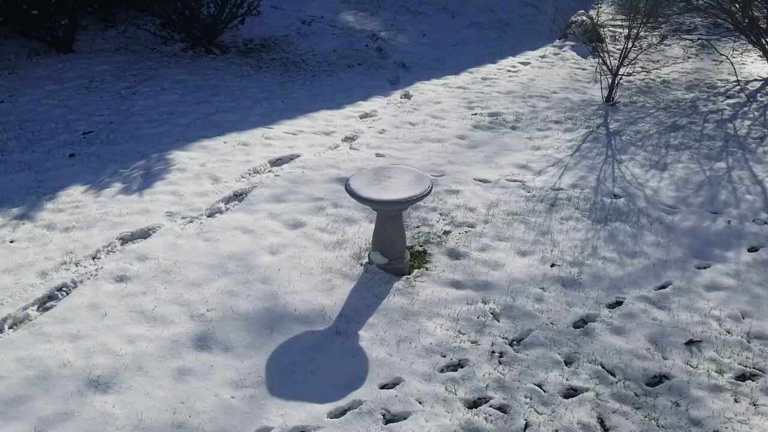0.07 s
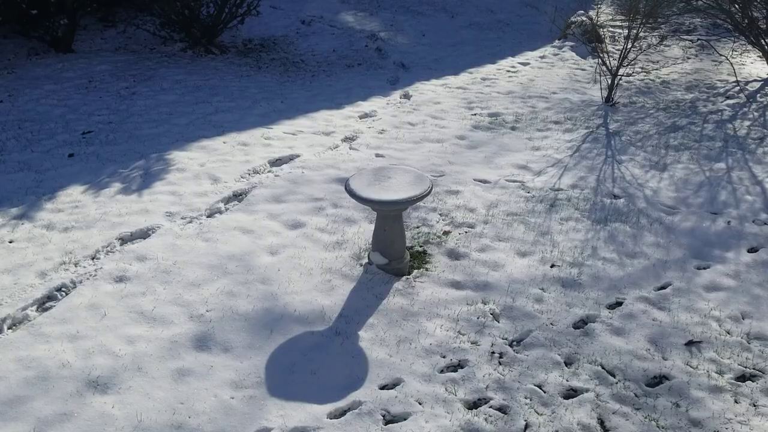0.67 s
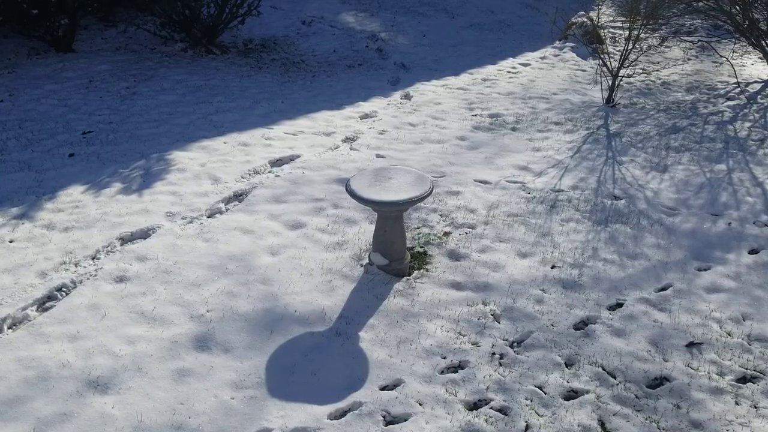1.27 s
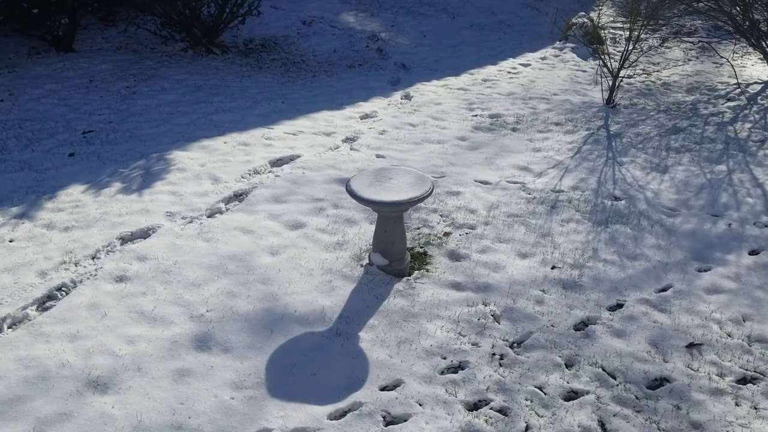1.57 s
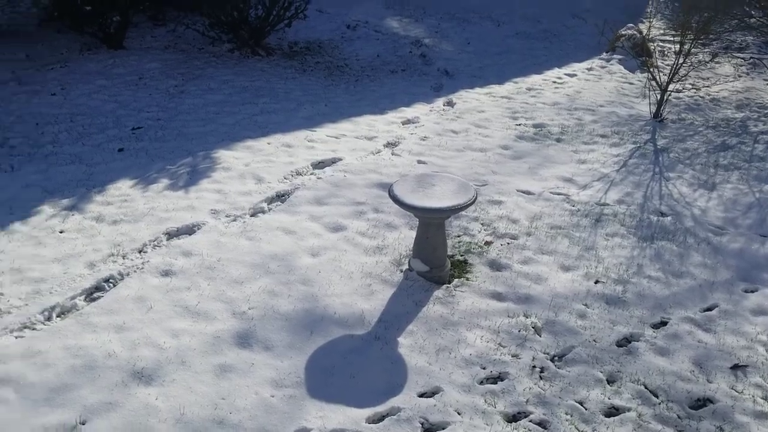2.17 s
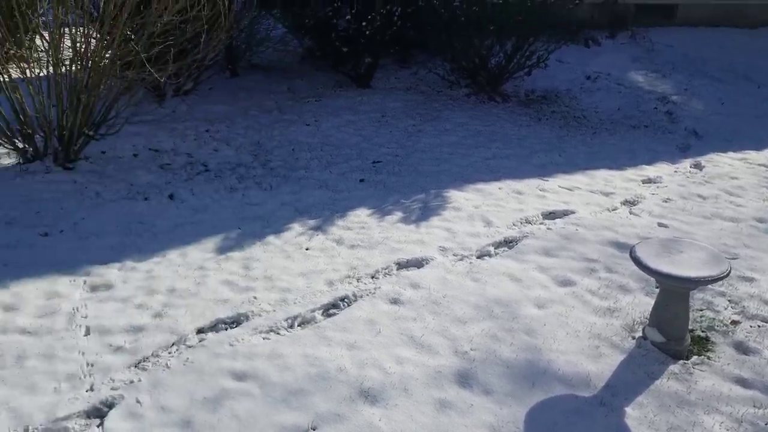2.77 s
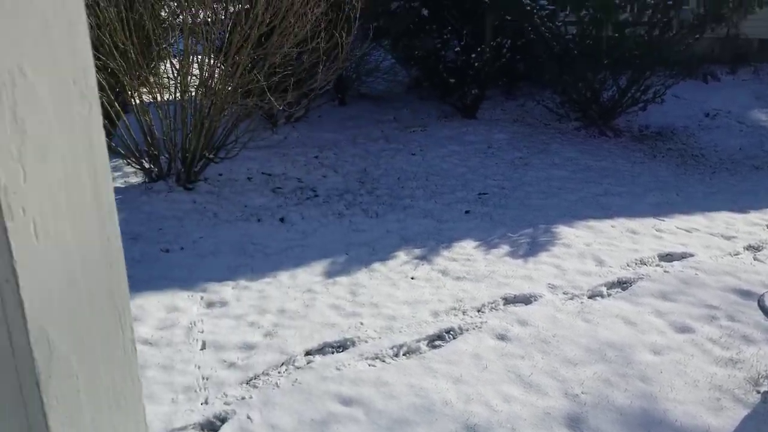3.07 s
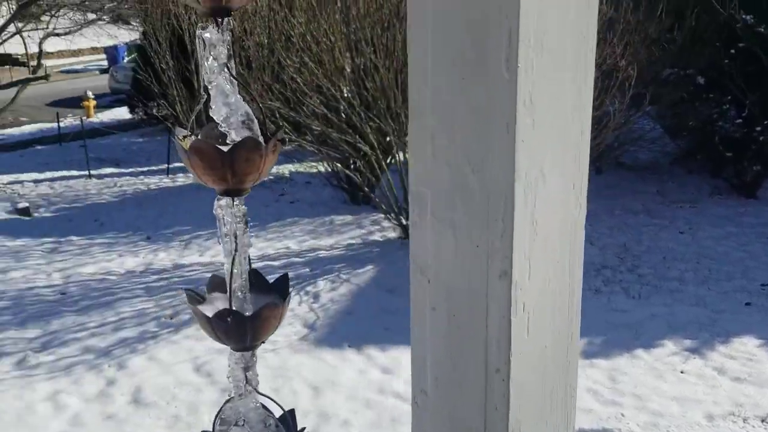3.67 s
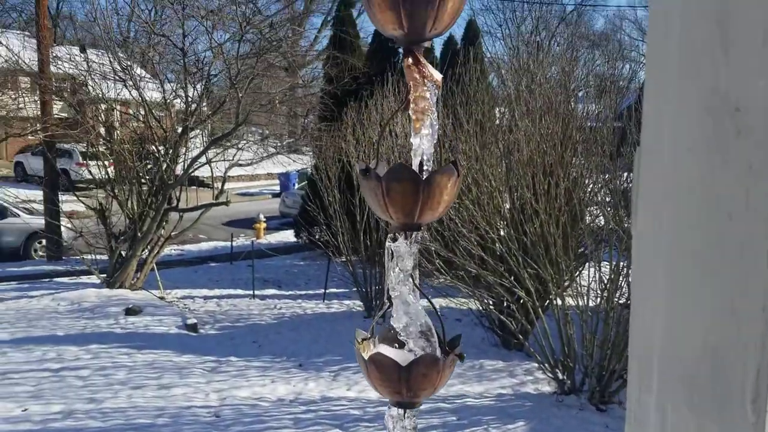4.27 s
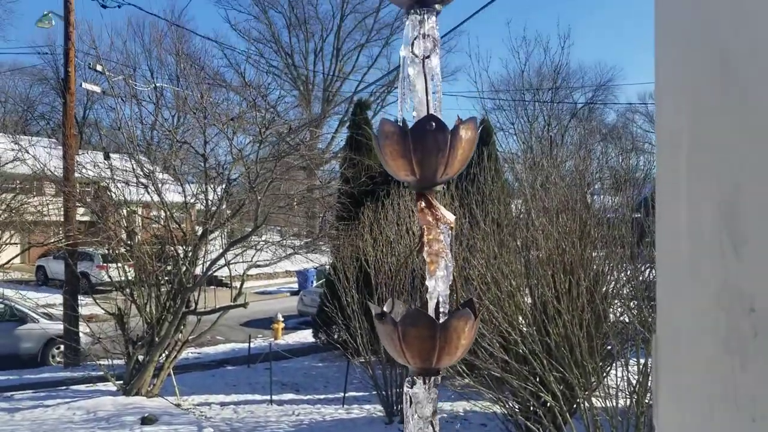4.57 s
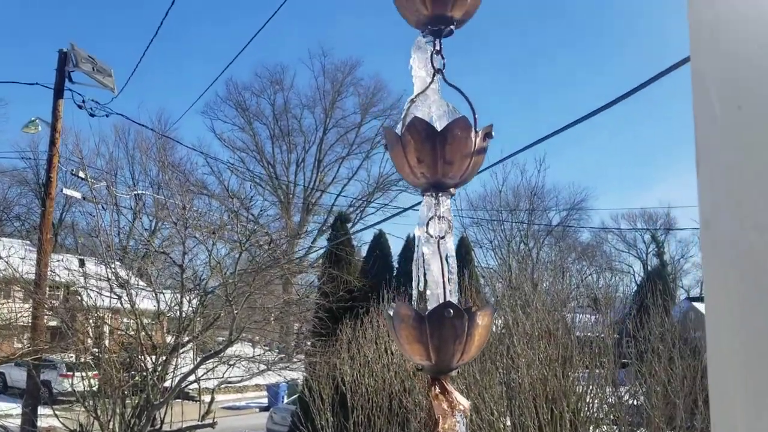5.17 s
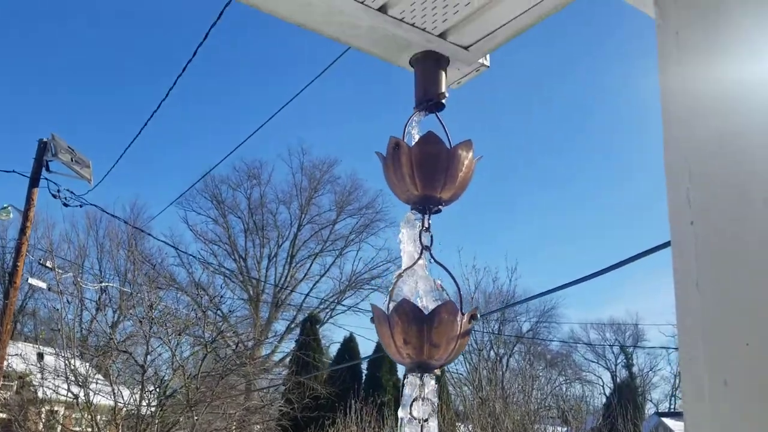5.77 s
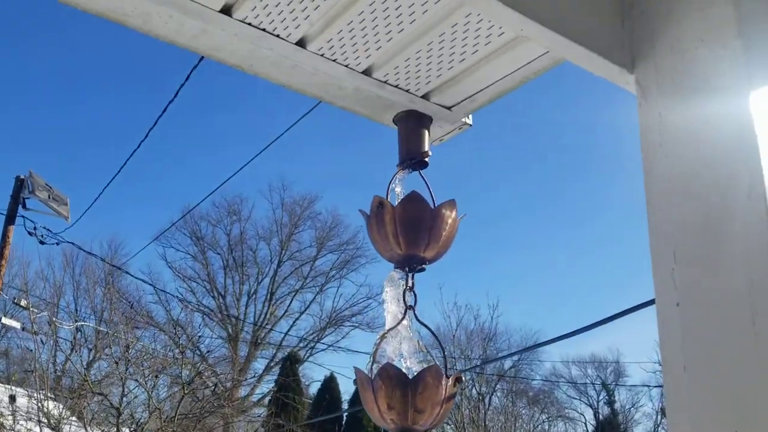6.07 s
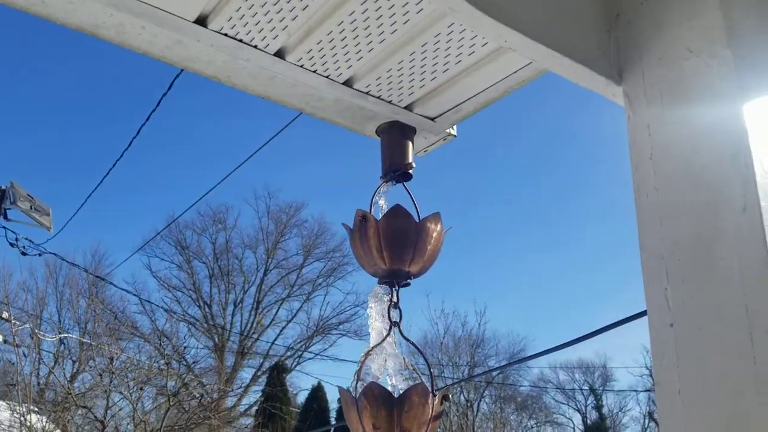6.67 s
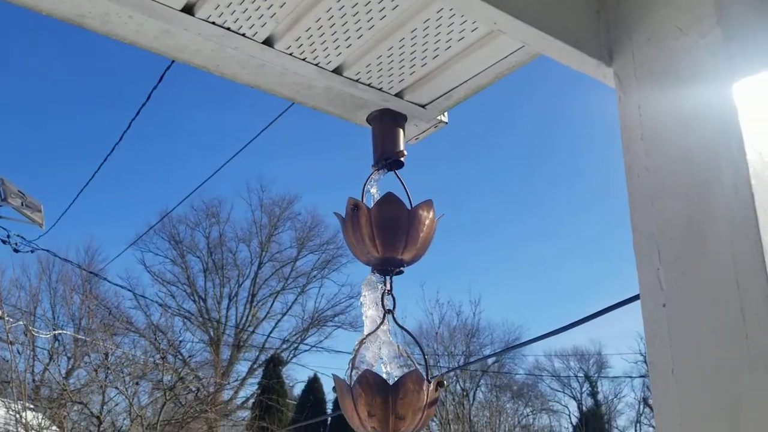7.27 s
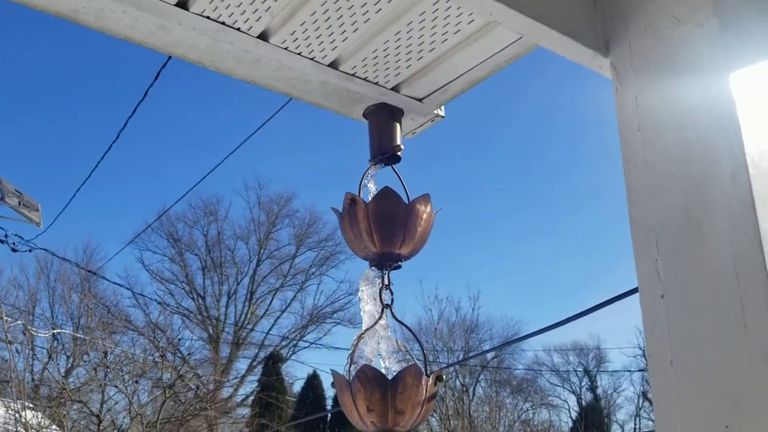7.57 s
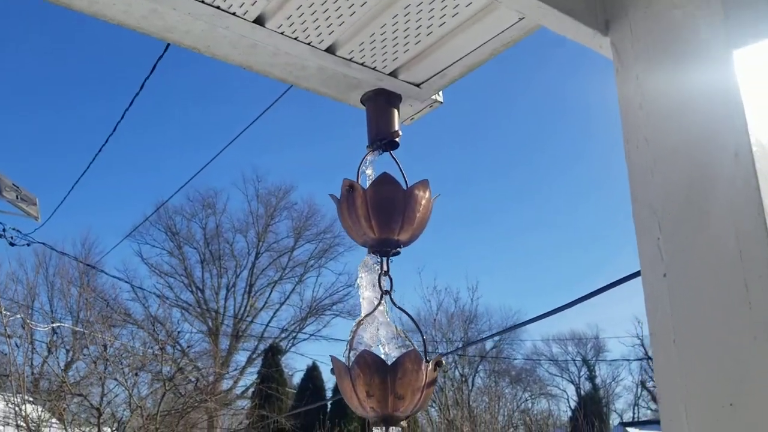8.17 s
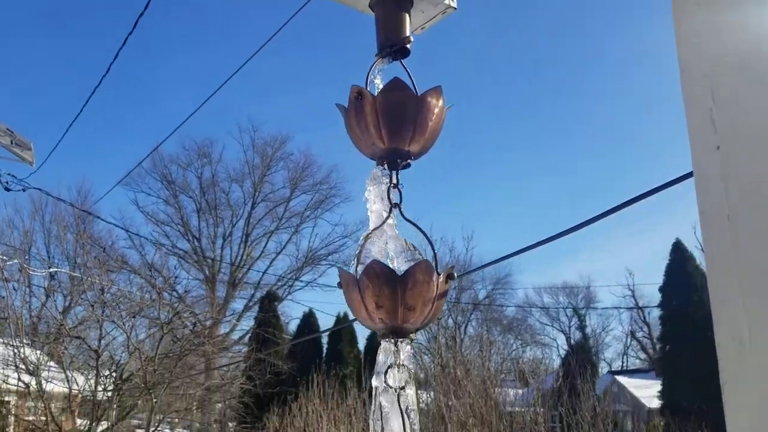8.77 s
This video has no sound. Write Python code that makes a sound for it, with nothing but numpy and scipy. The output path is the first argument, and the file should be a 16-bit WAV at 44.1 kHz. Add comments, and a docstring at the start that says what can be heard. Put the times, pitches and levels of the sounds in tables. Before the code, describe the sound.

Thin ticks of dripping water outdoors above far traffic rumble, with soft wind puffs, jacket rustle and a sharp double splat near the end.

```python
"""Far traffic hums while meltwater ticks off a frozen rain chain, on a porch in a snowy suburb.
Each drip is an impact that excites a short ring and a spatter. Small birds pipe. A puff of air buffets
the microphones; a jacket rustles by friction and fingers bump the case as the camera swings from the
yard up to the eaves. Near the end two drops slap the hollow case beside its left microphone."""
import sys
import numpy as np
from scipy import signal
from scipy.fft import rfft, irfft, next_fast_len
from scipy.io import wavfile
from scipy.ndimage import uniform_filter1d, map_coordinates

SR = 44100
rng = np.random.default_rng(int(sys.argv[2]) if len(sys.argv) > 2 else 0)


def store_pcm(level_fs):
    """Save levels as 16-bit WAV."""
    pcm = np.round(np.clip(level_fs, -1, 1) * 32767).astype(np.int16)
    wavfile.write(sys.argv[1], SR, np.atleast_2d(pcm).T)


N = 388962

# Levels in the tables are relative: each source applies its own gain. pan_db is left minus right.
# Strength of the far traffic: time_s, rumble_db, road_db
TRAFFIC_LEVELS = [(0.3, -48.5, -58), (2.0, -49, -55.5), (3.2, -46, -56.5), (3.85, -47, -58),
                  (4.2, -51.5, -61), (5.6, -47.5, -61.5), (6.4, -48, -62), (7.1, -48.5, -63),
                  (8.5, -51.5, -61), (8.8, -46.5, -56)]
# Spectrum of its rumble: frequency_hz, gain_db
RUMBLE_SPECTRUM = [(20, -45), (32, -6.5), (45, -3.5), (55, 1), (75, -8), (100, -5), (135, -16.5),
                   (190, -36.5), (400, -78)]
# Road noise facing the yard, and facing the eaves: frequency_hz, left_db, right_db
YARD_SPECTRUM = [(89.5, -5, -8), (172, -0.5, -1), (318, 1, -1), (443, -7.5, -9), (674, -12, -13),
                 (930, -14.5, -16), (1350, -24, -24.5), (2020, -21, -23), (2540, -31, -39),
                 (2840, -36, -24.5), (4000, -33.5, -30), (4660, -35, -41), (6660, -44, -67),
                 (9400, -77, -76.5), (15900, -38, -44)]
EAVES_SPECTRUM = [(81.6, -13.5, -6.5), (188, 4, 1.5), (332, -5, -6.5), (503, -4.5, -10), (903, -13, -15.5),
                  (1220, -25, -29.5), (1370, -23, -27), (1740, -12.5, -24), (2120, -10, -31),
                  (2610, -24.5, -30), (3120, -39, -42.5), (4080, -34, -40), (5630, -28, -37),
                  (7000, -43, -47), (9600, -39, -37.5), (16200, -28, -24.5)]
# Turn of the camera toward the eaves: time_s, power_share
EAVES_SHARE = [(1.5, 0.08), (3.5, 0.25), (5.5, 0.95), (6.3, 1)]
# Likeness of diffuse sound at the two microphones: frequency_hz, correlation
COHERENCE = [(60, 0.89), (150, 0.91), (380, 0.67), (950, 0), (2400, 0)]
# Strength of the fine high hiss: time_s, level_db
HISS_LEVELS = [(0.1, -68.5), (1.5, -73.5), (2.75, -69.5), (4.1, -61.5), (6.25, -64), (6.9, -71.5),
               (8.82, -66)]
# Spectrum of that hiss: frequency_hz, gain_db
HISS_SPECTRUM = [(3000, -1), (7000, -7), (9500, -11), (11500, -1), (12800, 3.5), (14000, -1.5), (15800, 1)]
# The clearest drips on ice and copper: start_s, level_db, pitch_hz
CHAIN_DRIPS = [(0.176, -51, 11000), (0.283, -55, 8500), (0.478, -56, 7800), (0.876, -58, 9600),
               (1.0893, -54, 5550), (1.134, -56, 8600), (1.5207, -58, 5440), (1.7143, -52, 7570),
               (1.793, -47.5, 13600), (2.2453, -48, 14700), (2.2644, -54, 8000), (2.4089, -43, 14900),
               (2.586, -51, 11600), (2.879, -41.5, 12500), (2.96, -41, 15000), (3.001, -56, 5700),
               (3.1273, -47, 12300), (3.1707, -48, 12400), (3.245, -43, 14600), (3.269, -42, 14400),
               (3.3692, -46, 12700), (3.4818, -49, 9260), (3.969, -41, 5500), (4.1769, -42.5, 9040),
               (4.3545, -42, 14100), (4.3667, -47, 7500), (4.731, -39, 14900), (4.8686, -49.5, 5400),
               (4.9162, -34, 15100), (5.0043, -50, 5700), (5.0986, -52, 5900), (5.43, -39, 12400),
               (5.4513, -47, 5620), (5.9033, -49, 5170), (6.15, -43, 12000), (6.3974, -36, 15000),
               (6.4151, -46, 10300), (6.4323, -31.5, 15700), (6.653, -52, 5150), (6.8494, -40, 14700),
               (6.9394, -54, 9620), (7.0346, -44, 5850), (7.113, -46.5, 11500), (7.216, -53, 6100),
               (7.289, -37.5, 12900), (7.4093, -36.5, 11300), (7.6685, -50, 13500), (7.7653, -47, 15300),
               (7.9174, -52, 5450), (7.9857, -48, 15200), (8.079, -48, 6090), (8.1244, -53, 8300),
               (8.164, -37, 12500), (8.3405, -44.5, 11000), (8.4213, -43.5, 6650), (8.5475, -48, 8900),
               (8.6118, -41, 14900)]
# Lower drips fall into wet cups, so they ring and splash more: pitch_hz, ring_gain, spatter_gain
DRIP_WETNESS = [(4500, 0.58, 0.41), (6000, 0.49, 0.35), (9000, 0.32, 0.26), (15000, .1, 0.22)]
# Thin bird notes: middle_s, length_s, pitch_hz, level_db
BIRD_NOTES = [(0.413, 0.057, 3980, -67), (0.57, 0.26, 7450, -80), (1.73, 0.14, 7640, -75),
              (2.67, 0.054, 2750, -67), (2.935, 0.043, 2650, -62), (3.754, 0.05, 2620, -60),
              (7.147, 0.15, 1724, -67.5), (7.85, 0.15, 4880, -74.5)]
# Jacket rubs with their rasps, and a few faint, narrow, whistling swells of noise:
# start_s, length_s, rise_share, broad_db, band_hz, glide_octaves, width_octaves, band_db, pan_db
RUBS_AND_SWELLS = [(1.5, 0.35, 0.61, -64.5, 2950, 0, .22, -67.5, 0),
                   (1.5, .32, .45, -70, 1600, 0, .2, -66.5, -1), (1.95, .22, .4, -65, 1700, 0, .35, -71, 0),
                   (1.85, 1.12, 0.39, -66.5, 2380, -0.075, .13, -69.5, -3),
                   (2.86, .12, .2, -57.5, 2000, 0, 0.57, -60.5, 0),
                   (3.22, 0.35, 0.28, -57.5, 2400, -.3, .5, -65, -2),
                   (3.5, .8, .55, -57, 1800, .2, .7, -58.5, -3),
                   (3.45, 1.285, .42, -59, 3830, -0.21, 0.32, -60, 4.5),
                   (3.95, .6, 0.16, -60, 2030, -.1, 0.25, -62, 9),
                   (4.48, .26, 0.41, -52.5, 1920, .15, 0.38, -57.5, 6),
                   (4.738, 0.048, 0.22, -55, 2750, 0, 1, -54.5, 0),
                   (4.72, .18, 0.22, -55, 2100, -.5, 0.5, -57.5, -1),
                   (5.0, 0.2, .45, -57, 2050, .1, 0.55, -61.5, 3),
                   (4.9, 0.52, .45, -72, 650, 0.15, .5, -59, 5),
                   (5.35, .29, 0.48, -53.5, 1300, .35, .65, -56, 1),
                   (5.3, 0.74, 0.12, -58.5, 3350, -0.033, .19, -63, 3.5),
                   (6.02, .32, 0.57, -59, 1100, 0, .7, -67, 0),
                   (8.57, .4, .45, -57, 2500, .15, .17, -64, 2)]
# Spectrum of rubbing cloth: frequency_hz, left_db, right_db
CLOTH_SPECTRUM = [(150, -2.5, -2), (352, -12, -8), (594, -2, -8.5), (1170, -8, -10.5), (1630, -7.5, -8.5),
                  (1940, -14.5, -11), (2730, -18.5, -14), (4020, -15.5, -22), (4900, -20.5, -25.5),
                  (6800, -23, -34), (10000, -26.5, -24.5), (16000, -35, -27)]
# Puffs of air on the microphones: middle_s, length_s, level_db, pan_db, pitch_ratio
AIR_PUFFS = [(1.78, 0.46, -46.5, 0, 1.13), (2.038, .13, -42.5, -19, 0.92), (2.332, 0.17, -39, -11, 0.8),
             (2.77, 0.35, -37.5, 17, 0.9), (3.16, 0.26, -40, 17, 1.42), (3.362, 0.27, -46.5, -1, 1.07)]
# Spectrum of their buffeting: frequency_hz, gain_db
BUFFET_SPECTRUM = [(20, -14), (35, -9), (55, 14), (85, 5), (140, -5), (200, -24.5), (500, -67)]
# Strength of a distant vehicle's whine: time_s, level_db
WHINE_LEVELS = [(1.7, -82), (2.0, -65), (2.4, -60), (2.85, -60.5), (3.1, -85)]
# Soft finger bumps on the case: start_s, level_db, pitch_hz, pan_db
FINGER_BUMPS = [(2.877, -37.5, 420, -12), (3.237, -36, 340, 8), (3.307, -39, 560, 10),
                (3.734, -42, 563, 3.5), (3.844, -35, 520, 9), (3.875, -32, 515, 15), (4.433, -43.5, 840, 6),
                (4.659, -45, 428, 20), (5.01, -39, 567, 19), (5.075, -41.5, 460, 23), (5.47, -40, 354, 10),
                (6.183, -36.5, 675, 24), (8.093, -43.5, 395, 18), (8.611, -45, 458, 7),
                (8.784, -39.5, 647, 14)]
# Drops landing on the camera:
# start_s, thud_db, pitch_ratio, tilt_db_per_octave, second_slap_ratio, spray_db, spray_hz, spray_life_s
CASE_DROPS = [(8.2055, 11, 1.05, 1.5, 1.1, -28, 5800, 0.018), (8.2678, 26, .99, 0, .12, -30, 5060, .015)]
# Response of the struck case: frequency_hz, gain_db
CASE_RESPONSE = [(40, -31), (145, -5.5), (340, 3), (520, -8), (670, -30), (850, -8.5), (1080, -4),
                 (1450, -7.5), (1950, -13.5), (2600, -27), (4800, -27), (8000, -39), (15000, -63)]
# Spectrum of a bursting drop: frequency_hz, gain_db
SPLASH_SPECTRUM = [(80, -6), (200, 13), (380, 15.5), (700, 3), (1200, 7), (1900, 6.5), (2700, -5.5),
                   (5000, -16), (10000, -17), (16000, -24)]


def amp(db):
    return 10 ** (np.asarray(db) / 20)


def unit(x):
    return x / np.sqrt(np.mean(x ** 2) + 1e-20)


def along(table, hz):
    """Each column after the frequency, interpolated on a log-frequency axis."""
    knots_hz, *columns = np.transpose(table)
    return np.array([np.interp(np.log(hz + 1), np.log(knots_hz + 1), c) for c in columns])


def curves(table):
    """Each column after the time, interpolated to one value per sample."""
    knots_s, *columns = np.transpose(table)
    return np.array([np.interp(np.arange(N) / SR, knots_s, c) for c in columns])


def wobble(rate_hz):
    """Random modulation: a smooth curve through rate_hz Gaussian knots a second."""
    knots = rng.standard_normal(int(N * rate_hz / SR) + 4)
    fine = np.arange(0, len(knots) - 1, 1 / 8)
    return np.interp(np.arange(N) * rate_hz / SR, fine, map_coordinates(knots, [fine]))


def gate(start_s, end_s, edge_s):
    """A trapezoidal envelope, 0-1."""
    t = np.arange(N) / SR
    return np.clip(np.minimum(t - start_s, end_s - t) / edge_s, 0, 1)


def arch(length_s, rise):
    """A raised-cosine envelope, 0-1, peaking at the share rise of its length."""
    progress = np.linspace(0, 1, int(length_s * SR))
    triangle = np.interp(progress, [0, np.clip(rise, .05, .95), 1], [0, 1, 0])
    return np.sin(np.pi / 2 * triangle) ** 2


def sides(pan_db):
    """Level difference between channels: left and right gains whose mean is 1."""
    gains = amp([[pan_db / 2], [-pan_db / 2]])
    return gains / gains.mean()


def add(track, start_s, sound):
    """Superpose a sound on a track."""
    part = track[:, max(round(start_s * SR), 0):][:, :sound.shape[-1]]
    part += sound[..., :part.shape[-1]]


def filtered(x, response):
    """Linear filtering: the spectrum of x times a response of frequency."""
    n = x.shape[-1]
    padded = next_fast_len(n + 8192)
    return irfft(rfft(x, padded) * response(np.fft.rfftfreq(padded, 1 / SR)), padded)[..., :n]


def resonance(centre_hz, octaves):
    """A resonant peak on a log-frequency axis, at half amplitude octaves from its centre."""
    return lambda hz: 1 / (1 + (np.log2((hz + 1) / centre_hz) / octaves) ** 2)


def struck(gain_db, size=4096):
    """The minimum-phase impulse response of a body with a given gain against frequency."""
    cepstrum = irfft(np.log(amp(gain_db(np.fft.rfftfreq(size, 1 / SR)))))
    cepstrum[1:size // 2] *= 2
    cepstrum[size // 2:] = 0
    return irfft(np.exp(rfft(cepstrum)))


def diffuse(spectrum):
    """A diffuse field of rms 1: spaced microphones share long waves but not short ones."""
    def mid_side_gains(hz):
        angle = np.arccos(np.clip(along(COHERENCE, hz)[0], -1, 1)) / 2
        return np.array([np.cos(angle), np.sin(angle)])
    mid, side = filtered(rng.standard_normal((2, N)), mid_side_gains)
    return unit(filtered(np.array([mid + side, mid - side]), lambda hz: amp(along(spectrum, hz))))


def patchy(x, depth_db, patch_hz=260, patch_s=.03):
    """Random modulation in patches of time and frequency, with the total power conserved."""
    frames = signal.stft(x, nperseg=512)[2]
    field = rng.standard_normal(frames.shape[1:])
    for axis, size in enumerate([patch_hz * 512 / SR, patch_s * SR / 256]):
        field = uniform_filter1d(field, max(round(size), 1), axis)
    modulated = signal.istft(frames * amp(depth_db * unit(field)), nperseg=512)[1]
    return x.std() * unit(modulated[:, :N])


def tone(hz, drift, rate_hz):
    """Frequency modulation: a sine of rms 1 whose pitch wanders."""
    pitch_hz = hz * (1 + drift * wobble(rate_hz))
    return unit(np.sin(2 * np.pi * np.cumsum(pitch_hz) / SR))


def swell(length_s, hz, octaves, glide_octaves, rise):
    """Noise rising and falling in one gliding resonance."""
    envelope = arch(length_s, rise)
    noise = rng.standard_normal((2, 2 * SR))[:, :len(envelope) + 1024]
    f, t, frames = signal.stft(noise, SR, nperseg=1024)
    centre_hz = hz * 2 ** (glide_octaves * (t / length_s - .5))
    band = resonance(centre_hz, octaves)(f[:, None]) ** 2
    return envelope * unit(signal.istft(frames * band, nperseg=1024)[1][:, :len(envelope)])


def traffic():
    """Far traffic forms a diffuse field; the porch roof colours it as the camera turns upward."""
    rumble_db, road_db = curves(TRAFFIC_LEVELS)
    turned = np.clip(curves(EAVES_SHARE), 0, 1)
    yard = np.sqrt(1 - turned) * diffuse(YARD_SPECTRUM) * amp(4.0)
    eaves = np.sqrt(turned) * diffuse(EAVES_SPECTRUM) * amp(4.5)
    rumble = amp(rumble_db + 1.32 + .8 * wobble(4)) * diffuse(RUMBLE_SPECTRUM)
    engine = amp(-55 + 1.5 * wobble(2.39)) * tone(hz=70.5, drift=0.01297, rate_hz=5.4)
    road_gain = amp(road_db + 0.94 * wobble(6.2))
    road = road_gain * patchy(yard + eaves, depth_db=1.1, patch_hz=350, patch_s=.09)
    return road + (rumble + engine) * sides(1.0)


def high_hiss():
    """Broadband noise, flickering under random amplitude modulation, is heard as a fine hiss."""
    gain = amp(curves(HISS_LEVELS) + 0.5 + 0.8 * wobble(54))
    return gain * patchy(diffuse(HISS_SPECTRUM), depth_db=1.8, patch_hz=600, patch_s=.018)


def thin_whistle():
    """Narrowband noise has a pitch: a faint airy line, mostly right, that fades early in the turn."""
    line = unit(filtered(rng.standard_normal((2, N)), resonance(12750, octaves=.015)))
    level_db = curves([(2.1, -85), (2.6, -100)])
    return amp(level_db) * sides(-8) * line


def drip(hz, octaves=0.51, crack_db=3, crack_t60=0.0098, ring_t60=0.04, spatter_t60=0.22, variety=.25):
    """An impact excites a damped mode; its crack and spattering droplets share a high resonance."""
    t = np.arange(SR // 10) / SR
    ring_gain, spatter_gain = along(DRIP_WETNESS, hz)
    widen, stretch = np.exp(variety * rng.standard_normal(2))
    clumps = np.interp(t, np.linspace(0, t[-1], 70), rng.lognormal(0, .7, 70))
    droplets = unit(clumps * rng.standard_normal((2, len(t))))
    crack = rng.standard_normal((2, len(t))) * amp(crack_db - 60 * t / crack_t60)
    spatter = spatter_gain * droplets * amp(-60 * t / (spatter_t60 * stretch))
    tick = filtered(crack + spatter, lambda f: resonance(hz, octaves * widen)(f) ** 2)
    tick *= np.sqrt(SR / hz / widen)  # offsets the greater power of a wider band
    ring = np.sin(2 * np.pi * hz * t) * amp(-60 * t / (ring_t60 * stretch))
    return tick + ring_gain * ring


def rain_chain():
    """Impact sound: meltwater strikes the ice and copper of the chain, each drip at its own pitch."""
    out = np.zeros((2, N))
    for start_s, level_db, hz in CHAIN_DRIPS:
        add(out, start_s, amp(level_db - 7.5) * drip(hz))
    return out


def patter(count=140, over_hiss_db=17, top_hz=15500, span_hz=10000):
    """Tiny random impacts follow the level of the hiss; the lower ones are rarer and weaker."""
    out = np.zeros((2, N))
    hiss_db = curves(HISS_LEVELS)[0]
    for k, (when, smallness, depth, place) in enumerate(rng.random((count, 4))):
        onset = int((k + when) / count * N)
        hz = top_hz - span_hz * depth ** 2
        gain = amp(hiss_db[onset] + over_hiss_db - 10 * smallness) * (hz / top_hz) ** 1.3
        add(out, onset / SR, gain * sides(10 * (place - .5)) * drip(hz, octaves=0.18))
    return out


def birds():
    """Reverberation in the garden smears far, slightly falling notes into narrow bands of noise."""
    out = np.zeros((2, N))
    for middle_s, length_s, hz, level_db in BIRD_NOTES:
        note = swell(length_s, hz, octaves=0.096, glide_octaves=-.03, rise=0.42)
        add(out, middle_s - length_s / 2, amp(level_db) * note)
    return out


def jacket_and_swells(rest_db=-80.5, sleeve_db=-62.5):
    """Stick-slip friction: cloth slides in tiny catches and rasps as the arm swings.
    The few narrow bands are heard apart from it, as faint whistling swells of noise."""
    sliding = amp(rest_db) + amp(sleeve_db) * gate(start_s=2.72, end_s=6.34, edge_s=0.099)
    power = sliding[None] ** 2  # incoherent noises add in power
    bands = np.zeros((2, N))
    for start_s, length_s, rise, broad_db, hz, glide, octaves, band_db, pan_db in RUBS_AND_SWELLS:
        add(power, start_s, (amp(broad_db) * arch(length_s, rise)) ** 2)
        add(bands, start_s, amp(band_db) * sides(pan_db) * swell(length_s, hz, octaves, glide, rise))
    broad = np.sqrt(power) * patchy(diffuse(CLOTH_SPECTRUM), depth_db=2.5)
    flicker_db = 1.1 * wobble(50) + 2.6 * np.array([wobble(450), wobble(450)])
    return unit(amp(flicker_db)) * (broad + bands)


def air_puffs():
    """Turbulence buffets each microphone independently; quicker air gives a higher pitch."""
    out = np.zeros((2, N))
    for middle_s, length_s, level_db, pan_db, pitch in AIR_PUFFS:
        noise = filtered(rng.standard_normal((2, SR)), lambda hz: amp(along(BUFFET_SPECTRUM, hz / pitch)))
        n = int(length_s * SR)
        eddies = np.array([unit(port[:n]) for port in noise])
        envelope = gate(0, length_s, edge_s=0.074)[:n]
        gains = amp([[level_db + pan_db / 2], [level_db - pan_db / 2]])
        add(out, middle_s - length_s / 2, gains * eddies * envelope)
    return out


def vehicle_whine():
    """A distant vehicle radiates one tone, wavering in amplitude and frequency as it swells and fades."""
    gain = amp(curves(WHINE_LEVELS) + 1.95 * wobble(18))
    return gain * tone(hz=449.6, drift=0.005, rate_hz=32)


def finger_bumps(scuff_db=-23, scuff_t60=0.32, snap_db=-12, snap_t60=0.0054):
    """Heavy damping ends each knock on the case in a cycle or two; a faint scuff starts just before the
    finger's short snap and lingers after it."""
    out, t = np.zeros((2, N)), np.arange(SR // 8) / SR
    for start_s, level_db, hz, pan_db in FINGER_BUMPS:
        tap = struck(lambda f: 40 * np.log10(resonance(hz * 1.25, octaves=0.78)(f)))
        grit = unit(filtered(rng.standard_normal((2, len(t))), resonance(1500, octaves=0.62)))
        snap = grit * amp(level_db + snap_db - 60 * t / snap_t60)
        scuff = grit * amp(level_db + scuff_db - 60 * t / scuff_t60)
        add(out, start_s + 0.0017, amp(level_db) * sides(pan_db) * tap / np.abs(tap).max())
        add(out, start_s + 0.00172, sides(pan_db) * snap)
        add(out, start_s, scuff)
    return out


def drops_on_case(spray_rise_s=0.0019, second_slap_s=.00062, shadow_db=-30, shadow_hz=1400):
    """A drop excites the hollow case, slaps again as it flattens, and sprays the left port.
    The right port lies in the acoustic shadow of the case and gets only a weak, dull sound."""
    out, t = np.zeros((2, N)), np.arange(SR // 10) / SR
    for start_s, thud_db, pitch, tilt_db, second_ratio, spray_db, spray_hz, life_s in CASE_DROPS:
        left_db = lambda hz: (thud_db + along(CASE_RESPONSE, hz / pitch)[0]
                              + tilt_db * np.log2(hz / 500 + .1))
        right_db = lambda hz: left_db(hz) + shadow_db - 20 * np.log10(1 + (hz / shadow_hz) ** 2)
        slap = -np.array([struck(left_db), struck(right_db)])
        mist = unit(filtered(rng.standard_normal(len(t)), resonance(spray_hz, octaves=0.49)))
        wash = unit(filtered(rng.standard_normal(len(t)), lambda hz: amp(along(SPLASH_SPECTRUM, hz))))
        envelope = (1 - np.exp(-t / spray_rise_s)) * np.exp(-(t / life_s) ** 2)
        spray = amp(spray_db - 5) * (0.88 * mist + 1.35 * wash) * envelope
        add(out, start_s, slap)
        add(out, start_s + second_slap_s, second_ratio * slap)
        add(out, start_s, amp([[0], [-40]]) * spray)
    return out


def scene():
    """Superposition: the pressures of all sources around the porch add."""
    return (traffic() + high_hiss() + thin_whistle() + rain_chain() + patter() + birds()
            + jacket_and_swells() + air_puffs() + vehicle_whine() + finger_bumps() + drops_on_case())


def record(dry, top_hz=16050):
    """Band limiting: the sound opens after a tenth of a second and holds nothing above top_hz."""
    opening = np.interp(np.arange(N) / SR, [.098, .115], [.003, 1])
    return filtered(dry * opening, lambda hz: hz < top_hz)


dry = scene()
out = record(dry)
store_pcm(out)
```